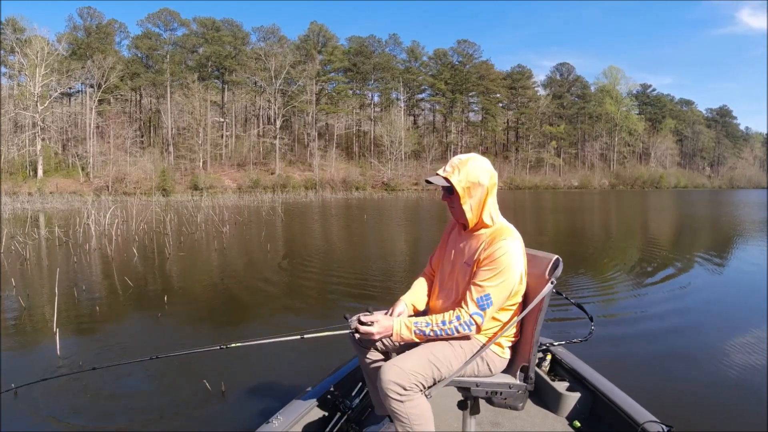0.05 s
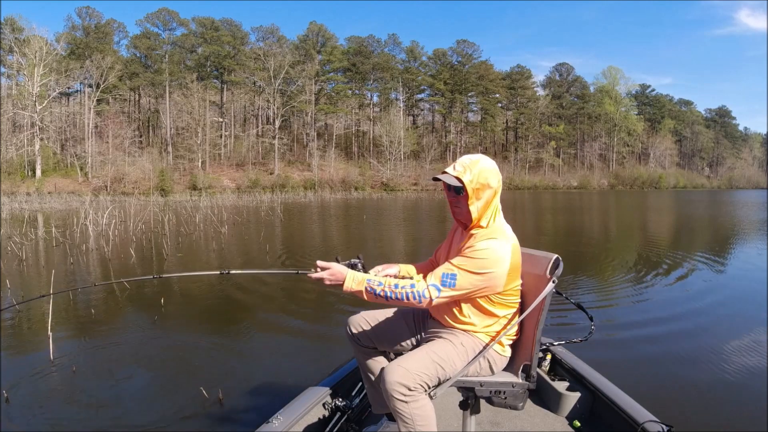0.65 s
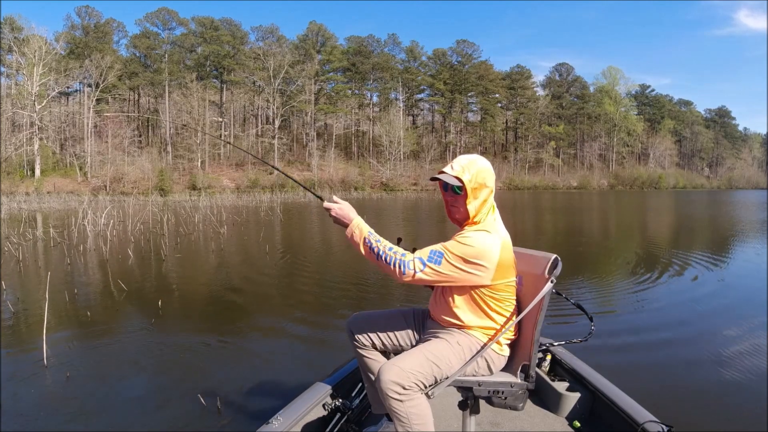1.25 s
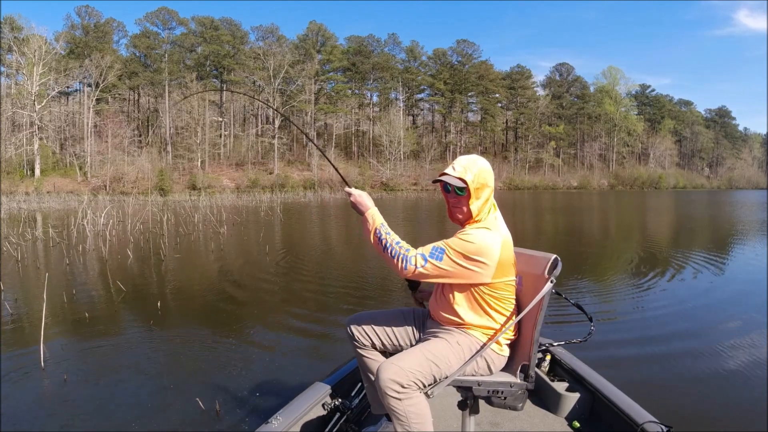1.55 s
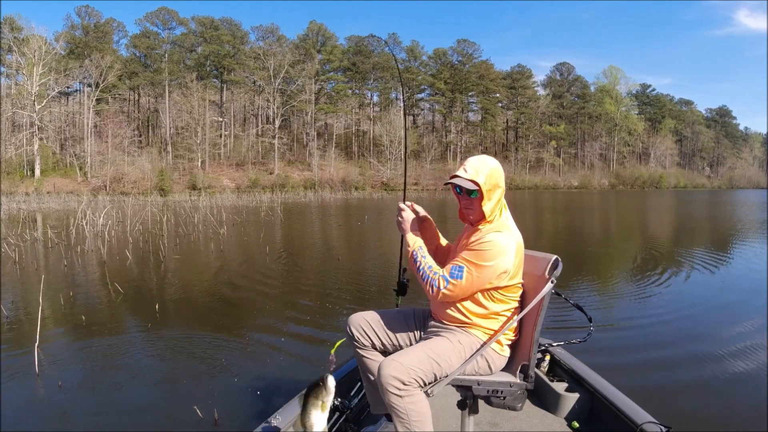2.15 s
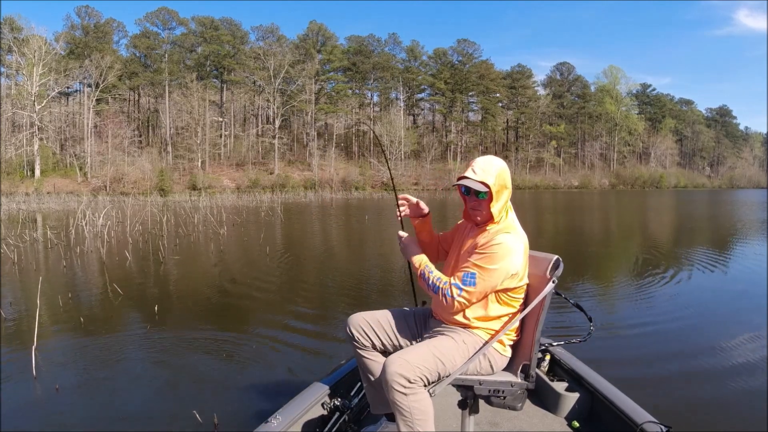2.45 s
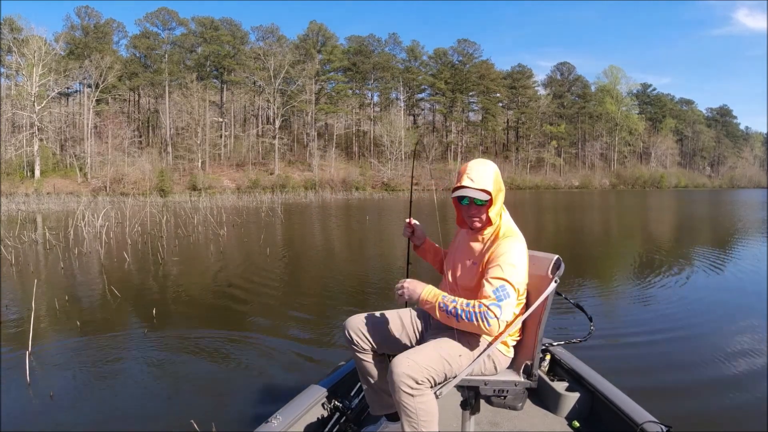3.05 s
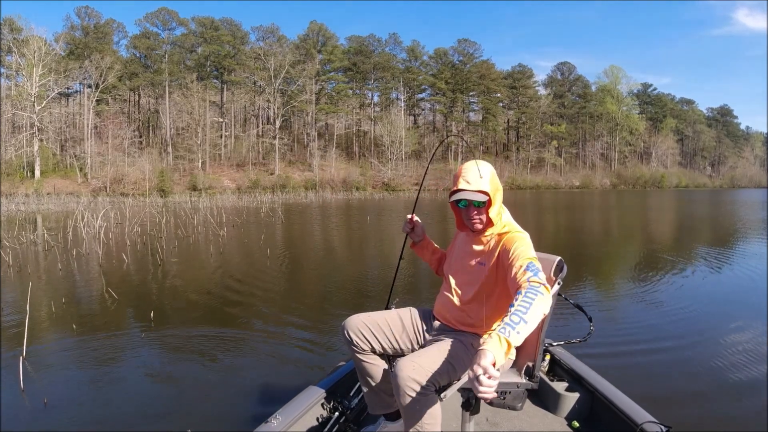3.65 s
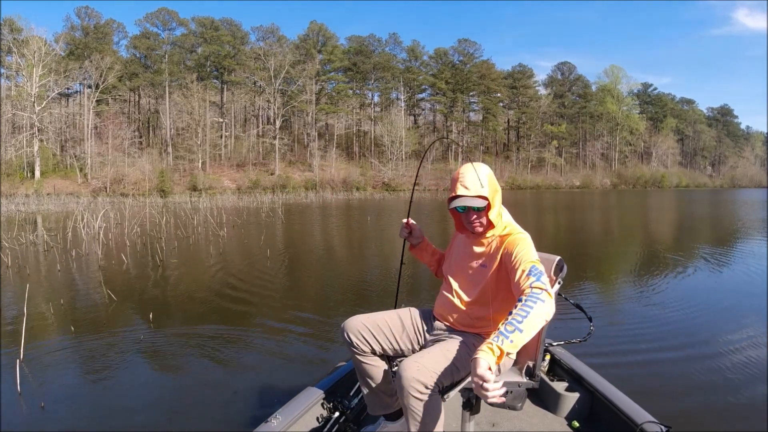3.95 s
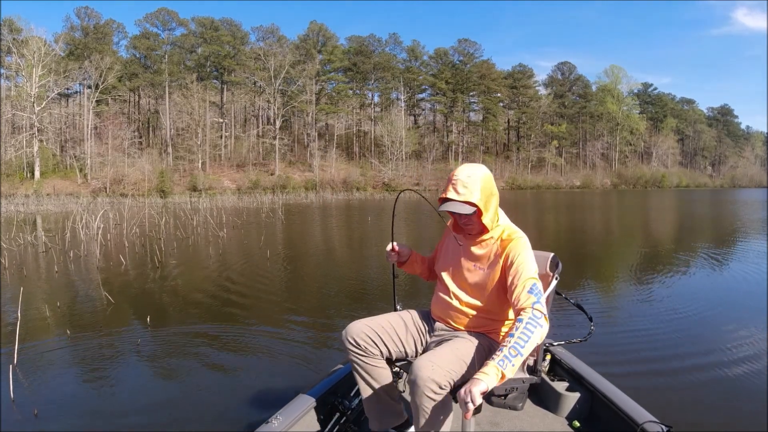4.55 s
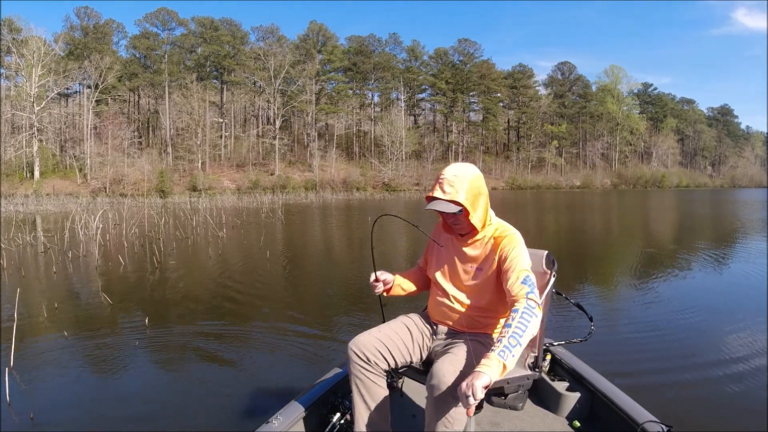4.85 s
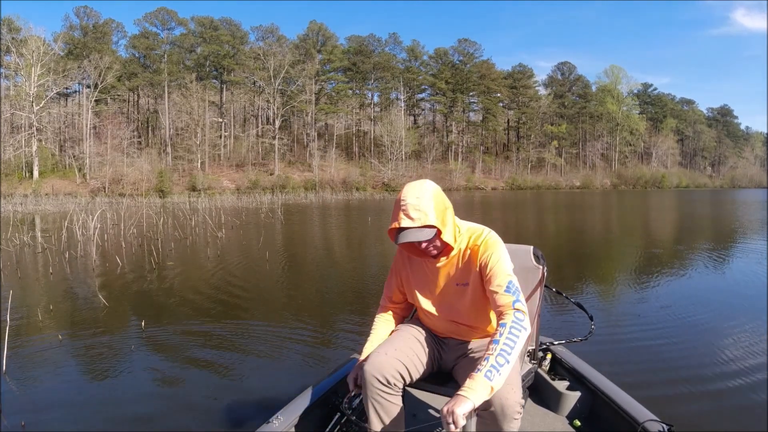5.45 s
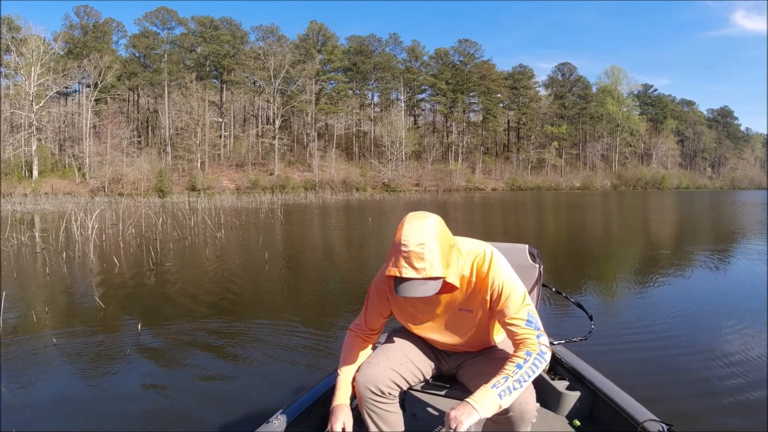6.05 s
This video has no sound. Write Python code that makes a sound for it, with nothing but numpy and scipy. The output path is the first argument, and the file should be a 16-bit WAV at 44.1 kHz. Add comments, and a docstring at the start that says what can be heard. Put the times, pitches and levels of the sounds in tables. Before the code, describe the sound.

A hooked fish plops and splashes beside a small metal boat while a swivel seat creaks. The fish plunges with a soft thud and a burst of spray, then comes aboard with dripping and sharp slaps. The seat creaks again, dull knocks sound through the hull, and tackle ticks faintly amid rubbing cloth. A last creak and lighter bumps follow. The microphone is close, with a faint breeze over a still lake.

```python
"""Plops and splashes: a fish is played to a small metal boat on a still lake, thrashes, plunges with a
thud and is swung aboard, dripping. The water sounds through ringing bubbles, slaps and spray. The
angler's swivel seat creaks in stick-slip jerks that travel through the hull; the deck takes knocks and
scuffs, the tackle ticks and jingles. Two close microphone ports hear it over a faint air rumble."""
import sys
import numpy as np
from scipy import signal
from scipy.fft import rfft, irfft, next_fast_len
from scipy.io import wavfile
from scipy.ndimage import uniform_filter1d

SR = 44100
rng = np.random.default_rng(int(sys.argv[2]) if len(sys.argv) > 2 else 0)


def store_pcm(level_fs):
    """Save levels as 16-bit WAV."""
    pcm = np.round(np.clip(level_fs, -1, 1) * 32767).astype(np.int16)
    wavfile.write(sys.argv[1], SR, np.atleast_2d(pcm).T)


N = 277830
EVENT_SIZE = 16384
AGE_S = np.arange(EVENT_SIZE) / SR
ANTIPHASE = np.array([[1], [-1]])

# soft thuds: the fish plunging beside the hull, then blows on the deck
# (time [s], thud [dB], boom [dB], second impact delay [s])
LOW_THUDS = [(1.663, -27.5, -37.5, .012), (1.756, -38.5, -41.5, 0.014), (2.683, -22, -24, .023),
             (2.815, -25, -21.5, .016), (3.101, -35.5, -36.5, .015), (3.201, -36, -37, .013),
             (3.74, -26, -38.5, .012), (3.807, -26, -43.5, 0.0084), (5.006, -36, -39.5, 0.017),
             (5.312, -46, -52.5, 0.0095), (5.481, -36.5, -47, .014), (5.561, -43.5, -48, .012),
             (5.632, -53, -42, 0.017), (5.873, -46, -60.5, .015)]
# spectrum of spray and wet swish: (frequency [Hz], level [dB])
SPRAY_SPECTRUM = [(3000, -18.5), (5000, -3.5), (6500, -8), (9500, -2), (11000, -22), (14000, -19.5),
                  (15500, -31.5)]
# side signal of the two ports: (frequency [Hz], gain [dB])
SIDE_SPECTRUM = [(60, -20), (150, -23.5), (400, -29), (700, -21.5), (1300, -12), (2400, -8), (3500, -6.5),
                 (4500, 4), (6000, -1.5), (8500, 0.5), (15000, -3)]


def splash():
    """Churned water: a swarm of small bubbles, plinking drops among them, fizzing spray above."""
    # surges of the fish: (crest [s], splash [dB], spray [dB], rise [s], t60 [s])
    surges = [(.2, -56.5, -88, 0.39, 0.56), (.84, -54.5, -110, 0.45, 1), (.93, -39.5, -51, 0.16, 0.37),
              (1.02, -32, -45.5, 0.13, 0.38), (1.11, -49, -66, 0.27, 0.18),
              (1.27, -58.5, -70.5, 0.98, 0.57), (1.662, -35, -50, 0.099, 0.13), (1.76, -54, -60, .25, 0.19),
              (1.9, -54, -87, 0.33, .5), (1.995, -47, -104, 0.13, 0.25)]
    # churned water: (frequency [Hz], level [dB])
    spectrum = [(100, -10.5), (300, 5.5), (700, 6.5), (1300, 4), (2200, -3), (4200, -5.5), (5200, -22),
                (8000, -36), (15000, -57)]
    churning, spraying = swells(surges)
    churn = grains(spectrum, per_s=2100, spread_db=3.0, cycles=10, band_hz=(325, 5950))
    drops = grains(spectrum, per_s=130, spread_db=7.5, cycles=140, band_hz=(818, 3460))
    spray = grains(SPRAY_SPECTRUM, per_s=4900, spread_db=3.0, cycles=54, band_hz=(4540, 14400))
    return churning * (from_db(2.0) * churn + from_db(-7.0) * drops) + spraying * spray


def bubbles(attack_s=0.00027, ring_cycles=56):
    """Trapped air rings, small pockets more briefly; most rise in pitch as they near the surface."""
    # larger air pockets: (time [s], level [dB], pitch [Hz], glide [octaves/s])
    pockets = [(.134, -28.5, 2304, 7), (.137, -44.5, 820, -3), (.176, -40, 519, 10.5),
               (.2, -38.5, 619, 10.5), (0.235, -33.5, 697, 4.5), (0.251, -45.5, 1740, -4),
               (.33, -43.5, 1340, -2.5), (0.782, -40, 1100, 3), (.801, -37.5, 1260, 3),
               (.814, -30, 513.5, 29), (.827, -24.5, 702, 22.5), (0.86, -27, 957, 15), (.87, -25.5, 590, 8),
               (0.837, -40, 2410, 10), (0.995, -33, 900, 15), (1.256, -44, 910, 11),
               (1.266, -42.5, 1820, 14), (1.335, -41.5, 1345, -0.5), (1.66, -28, 700, -7),
               (1.667, -34, 318.5, 3), (1.955, -39.5, 1314, 0), (2.022, -33.5, 1320, 7),
               (3.474, -40, 1297, 3.5)]
    out = np.zeros(N)
    for s, db, hz, glide in pockets:
        pitch_hz = hz * 2 ** np.minimum(glide * AGE_S, 1)
        ring = np.sin(2 * np.pi * np.cumsum(pitch_hz) / SR) * decay(ring_cycles / hz)
        add(out, s, from_db(db) * ring * onset(attack_s))
    return out


def slaps(crack_t60_s=0.015, patter_db=9.5, patter_cycles=71, width_octaves=0.86, attack_s=0.00095):
    """A sharp crack and a short patter, both centred on the pitch of what is hit."""
    # slaps and drops on water and boat: (time [s], level [dB], centre [Hz])
    hits = [(0.1254, -50, 2330), (0.133, -37, 2060), (.17, -43.5, 1980), (0.1973, -39, 2940),
            (0.765, -32, 2170), (.869, -30, 560), (1.642, -25.5, 4830), (1.656, -29, 1950),
            (1.725, -31.5, 1300), (1.7598, -28.5, 1010), (1.8663, -35, 1630), (1.8857, -33, 1520),
            (2.0006, -44.5, 1340), (2.0778, -23, 2260), (2.137, -39, 3460), (2.1438, -24, 3180),
            (2.19, -39, 1210), (2.6911, -25, 1050), (3.1183, -28.5, 2400), (3.1532, -23, 3770),
            (3.248, -35, 2420), (3.403, -36, 3700), (3.505, -24.5, 1400), (3.5996, -24, 3540),
            (3.6167, -33, 1330), (3.6798, -25.5, 3780), (3.7037, -37, 1470), (3.7966, -39.5, 1570),
            (4.154, -57, 3700), (4.317, -55.5, 2320), (4.724, -50.5, 4360), (4.801, -47, 4100),
            (5.8475, -33, 1380)]
    # slap noise: (frequency [Hz], level [dB])
    spectrum = [(100, 16.5), (600, 13), (4300, 8.5), (5400, -18.5), (7000, -22.5), (9500, -33),
                (12000, -28.5), (15000, -42.5)]
    attack = 1 - np.exp(-(AGE_S / attack_s) ** 2)
    out = np.zeros(N)
    for s, db, hz in hits:
        edges_hz = np.clip(hz * 2 ** (np.array([-.5, .5]) * width_octaves), 100, [SR / 3, SR / 2.2])
        band = signal.butter(1, edges_hz, "band", fs=SR, output="sos")
        grit = signal.sosfilt(band, noise(spectrum))
        envelope = (decay(crack_t60_s) + from_db(patter_db) * decay(patter_cycles / hz)) * attack
        add(out, s, from_db(db) * peak_one(grit * envelope))
    return out


def swivel_slips():
    """The swivel jerks singly and turns twice under the pull of the rod."""
    # single jerks: (time [s], level [dB], bass [dB])
    jerks = [(.4765, -48.5, 2.5), (.618, -48, -16), (2.4028, -38, 11), (2.4445, -32.5, 8), (2.4935, -31, 6),
             (2.575, -29.5, 5.5), (2.625, -30, 9), (2.7094, -26.5, 6), (2.7369, -27.5, 4.5),
             (2.7608, -26.5, 6), (2.7843, -28, 5.5), (2.8124, -32.5, -3.5), (2.8625, -29, 5),
             (3.6001, -35, 12), (3.6805, -37.5, 13), (3.746, -45, 13.5), (3.813, -44, 13)]
    # one curve per turn: (time [s], slip rate [1/s], level [dB], bass [dB])
    turns = [
        [(.89, 206, -40.5, 10.5), (.923, 182, -31.5, 2.5), (.96, 110, -45, 6.5)],
        [(1.0046, 87, -27, 2.5), (1.055, 180, -27.5, 5.5), (1.113, 55, -27, 4.5)],
    ]
    return [*jerks, *(slip for turn in turns for slip in stick_slip(turn))]


def foot_slips():
    """The seat's foot creaks as the angler leans over, then jerks singly."""
    # single jerks: (time [s], level [dB], bass [dB])
    jerks = [(5.478, -31.5, 2), (5.496, -40, -23), (5.5464, -38, -2), (5.5643, -39, -9), (5.6347, -45, -1),
             (5.665, -40.5, -37), (6.2712, -49, -20)]
    # leaning: (time [s], slip rate [1/s], level [dB], bass [dB])
    lean = [(4.9745, 66, -38.5, 6), (5.04, 42, -32.5, 9.5), (5.11, 90, -28.5, 5.5),
            (5.145, 122, -28.5, -1.5), (5.185, 64, -29.5, 8), (5.26, 50, -42, 15.5), (5.35, 55, -45, -1)]
    return [*jerks, *stick_slip(lean)]


def stick_slip(movement, jitter_s=.0005, spread_db=2.5, bass_spread_db=1, max_slips=64):
    """A loaded joint lets go once per step of wind-up; gives (time [s], level [dB], bass [dB])."""
    s, per_s, db, bass_db = np.transpose(movement)
    t = np.arange(s[0], s[-1], 1 / SR)
    wound_steps = np.cumsum(np.interp(t, s, per_s)) / SR
    scatter = rng.standard_normal((max_slips, 3)) * [jitter_s, spread_db, -bass_spread_db]
    at_s = np.interp(np.arange(wound_steps[-1]), wound_steps, t)[:max_slips]
    slips = np.transpose([at_s, np.interp(at_s, s, db), np.interp(at_s, s, bass_db)])
    return slips + scatter[:len(at_s)]


def seat():
    """Swivel and foot each shake their own hull modes and ping the post; the thuds ping it too."""
    # hull driven by the swivel: (frequency [Hz], level [dB], t60 [s])
    swivel_modes = [(230.6, 7.5, 0.055), (337.3, 14, 0.22), (450.5, 11, 0.062), (596.5, 10.5, 0.1),
                    (700, 12.5, 0.065), (900, 5.5, 0.027), (1309, 6.5, 0.17), (1610, 5, 0.016),
                    (1768, -1, 0.054), (2154, 14.5, 0.1), (2255, -9.5, 0.023), (2570, -10, 0.099),
                    (2937, -2, 0.013), (3380, -1, 0.0091), (3690, -20.5, 0.0076), (4040, -7.5, 0.016),
                    (4360, -8, 0.018)]
    # hull driven by the foot: (frequency [Hz], level [dB], t60 [s])
    foot_modes = [(190, 7.5, 0.11), (267, 5.5, 0.08), (434, 8, 0.094), (610, 6.5, 0.11), (716, 12.5, 0.041),
                  (900, 2, 0.029), (1416, 10, 0.084), (1620, 0.5, 0.0041), (2170, 6.5, 0.024),
                  (2405, -0.5, 0.013), (2715, 7, 0.024), (2944, 6, 0.021), (3770, 2, 0.0079),
                  (4200, -7, 0.0054), (4405, -10.5, 0.0037), (5500, -2.5, 0.057)]
    at_swivel, at_foot = swivel_slips(), foot_slips()
    swivel = creak(at_swivel, swivel_modes, travel_s=0.008375, first_db=5.0, bass_hz=1080,
                   echo_s=0.003, echo_db=-15.0, grind_db=1.5, grind_t60_s=0.04)
    foot = creak(at_foot, foot_modes, travel_s=0.00378, first_db=-1.5, bass_hz=1130,
                 echo_s=0.0031, echo_db=-3.0, grind_db=3.0, grind_t60_s=0.024)
    post = seat_post([*at_swivel, *at_foot, *LOW_THUDS])
    return from_db(-6.0) * swivel + from_db(-12.5) * foot + post


def creak(slips, modes, travel_s, first_db, bass_hz, echo_s, echo_db, grind_db, grind_t60_s):
    """Each slip sends a bending wave through the hull: treble first, bass last; the panels ring on."""
    # first arrival: (frequency [Hz], level [dB])
    first_spectrum = [(60, -15.5), (200, -5.5), (450, 4), (850, -5.5), (1200, -9), (1700, -9), (3300, -9),
                      (4400, -12), (5200, -38), (10000, -69)]
    hz = np.fft.rfftfreq(EVENT_SIZE, 1 / SR)
    first = from_db(first_db) * gain_at(first_spectrum, hz)
    rings = np.array([from_db(db) / (1 + 2j * np.pi * (hz - mode_hz) * t60_s / np.log(1000))
                      for mode_hz, db, t60_s in modes])
    rings /= 1 + (hz / np.array(modes)[:, :1] - 1) ** 2 * 30   # narrows each mode's skirts
    # wave speed goes as the root of frequency
    delay_s = travel_s * (np.sqrt(1000 / np.clip(hz, 250, 2200)) - np.sqrt(1000 / 2200)) + .001
    path = np.exp(-2j * np.pi * np.cumsum(delay_s) * hz[1])
    short_waves = hz ** 8 / (hz ** 8 + 2000.0 ** 8)
    path *= 1 + from_db(echo_db) * short_waves * np.exp(-2j * np.pi * hz * echo_s)   # bounce off a rib
    treble = (hz > 2000) & (hz < 4800)
    fade = np.minimum(1, 2 * (1 - AGE_S / AGE_S[-1])) ** 2
    out = np.zeros(N)
    for s, db, bass_db in slips:
        grit = rng.standard_normal(EVENT_SIZE) * decay(grind_t60_s)   # the joint grinds as it lets go
        slip = 1 + from_db(grind_db) * rfft(grit) / np.linalg.norm(grit) * hz / (hz + 500)
        mode_gains = from_db(rng.normal(0, 1.49, len(modes)))
        wave = slip * (first + mode_gains @ rings) * path
        treble_peak = peak_rms(irfft(wave * treble))
        bass_shelf = from_db(bass_db / (1 + (hz / bass_hz) ** 4))
        add(out, s, from_db(db) * irfft(wave * bass_shelf) * fade / treble_peak)
    return out


def seat_post(jolts, attack_s=0.0084):
    """Each jolt pings the steel post."""
    # steel post: (frequency [Hz], level [dB], t60 [s])
    modes = [(5040, 0, 0.025), (5550, -9, 0.06), (7750, -10, 0.065), (7880, -13, 0.024),
             (10100, -12, 0.019)]
    # how freely it rings as its load shifts: (time [s], gain [dB])
    freedom = [(1.1, -65), (2.62, -46), (2.72, -14), (3.8, -20.5), (4.95, -49), (5.45, -65)]
    out = np.zeros(N)
    for s, db, *_ in jolts:
        freedom_db = np.interp(s, *np.transpose(freedom))
        add(out, s, from_db(db + freedom_db) * struck(modes) * onset(attack_s))
    return out


def thuds(contact_s=0.0078, thud_t60_s=.11, ring_db=-1.5, boom_gain_db=6.0, boom_attack_s=0.0028):
    """A plunge or a blow thuds, rings the panels and booms the hull; a softer impact follows."""
    # thud: (frequency [Hz], level [dB])
    spectrum = [(40, -25), (130, 1), (280, 7.5), (700, -5), (1100, -14.5), (2200, -23.5), (4200, -33),
                (6000, -68)]
    # deck panels: (frequency [Hz], level [dB], t60 [s])
    panel_modes = [(137, -17, 0.29), (222.8, -6, 0.24), (284.6, -1.5, 0.23), (342, -13.5, 0.14),
                   (430, -4, 0.08), (547, -4, 0.15), (667, -12, 0.13), (744, 2, 0.052), (900, -17, 0.066)]
    # whole hull flexing: (frequency [Hz], level [dB], t60 [s])
    boom_modes = [(68.2, -3, .24), (79, -6, 0.21), (94.8, -1.5, 0.3), (139, -8.5, 0.1)]
    boom = sum(from_db(db) * np.sin(2 * np.pi * hz * AGE_S) * decay(t60) for hz, db, t60 in boom_modes)
    boom *= onset(boom_attack_s)
    out = np.zeros(N)
    for s, db, low_db, gap_s in LOW_THUDS:
        first, second = (s, db, low_db), (s + gap_s, db - 8.5, low_db - 8)
        for at_s, thud_db, boom_db in (first, second):
            thud = peak_one(noise(spectrum) * decay(thud_t60_s))
            panels = from_db(ring_db) * peak_one(struck(panel_modes))
            body = peak_one((thud + panels) * onset(contact_s))
            add(out, at_s, from_db(thud_db) * body + from_db(boom_db + boom_gain_db) * boom)
    return out


def scuffs():
    """Rubbing: a run of small dry catches, a finer swish of wet cloth above."""
    # sleeve, shoes and flapping fish: (crest [s], scuff [dB], hiss [dB], rise [s], t60 [s])
    strokes = [(3.106, -43, -54.5, .025, 0.18), (3.153, -43, -44, 0.11, 0.052),
               (3.195, -39.5, -48, 0.16, 0.24), (3.3, -46, -55, 0.05, 0.11), (3.39, -54.5, -92, 0.38, 0.26),
               (3.53, -50, -69, 0.27, 0.067), (3.76, -55.5, -72.5, 1, 0.16), (5.135, -41.5, -58, 0.3, 0.52),
               (5.378, -56.5, -98, 0.054, .2), (5.49, -48.5, -91, 0.069, 0.16),
               (5.56, -57.5, -92, .08, 0.18), (5.66, -65.5, -97, 0.57, 1), (6.29, -59, -91, 0.28, .3)]
    # cloth catching: (frequency [Hz], level [dB])
    spectrum = [(100, 13.5), (300, 14), (800, 2), (1600, -1.5), (3000, -4), (4400, -7), (5300, -22.5),
                (9000, -52), (15000, -52)]
    rubbing, hissing = swells(strokes)
    catches = grains(spectrum, per_s=1600, spread_db=-0.5, cycles=2.0, band_hz=(206, 5540))
    swish = grains(SPRAY_SPECTRUM, per_s=11000, spread_db=2.5, cycles=52, band_hz=(4630, 13100))
    return from_db(4.0) * rubbing * catches + from_db(-7.5) * hissing * swish


def ticks(attack_s=0.00069, t60_s=0.011):
    """Hard parts of the tackle touch with a short, bright snap."""
    # contacts: (time [s], level [dB])
    contacts = [(2.142, -86), (2.496, -69.5), (2.763, -54), (3.139, -41.5), (3.151, -35.5), (3.5996, -64),
                (3.6797, -53.5)]
    # snap: (frequency [Hz], level [dB])
    spectrum = [(2500, -19.5), (5000, 2.5), (9500, 0.5), (12000, -22), (15000, -21.5)]
    out = np.zeros(N)
    for s, db in contacts:
        snap = noise(spectrum) * decay(t60_s) * onset(attack_s)
        add(out, s, from_db(db) * peak_one(snap))
    return out


def jingle(attack_s=0.00055):
    """The lure's metal fittings tinkle as the fish shakes."""
    # shakes: (time [s], level [dB])
    shakes = [(2.078, -81.5), (3.141, -54.5), (3.153, -54), (3.181, -49), (3.228, -56)]
    # fittings: (frequency [Hz], level [dB], t60 [s])
    modes = [(9450, -1.5, 0.17), (10280, 0, .12), (11000, 0, 0.07), (13790, -1, 0.11), (13930, -14, .06)]
    out = np.zeros(N)
    for s, db in shakes:
        add(out, s, from_db(db) * struck(modes) * onset(attack_s))
    return out


def air(side_db=-5.5):
    """Faint rumble that follows the breeze, over a steady hush."""
    # breeze: (time [s], level [dB])
    breeze = [(0.0, -48.5), (1.2, -51), (1.9, -53.5), (3.79, -54.5), (4.05, -61.5), (4.8, -57.5),
              (6.3, -53.5)]
    # open-air hush: (frequency [Hz], level [dB])
    hush_spectrum = [(12, -35), (20, 4.5), (46, -10), (97, -22), (135, -17), (160, -21), (387, -29),
                     (433, -22.5), (1140, -29.5), (1460, -34), (2100, -34.5), (2340, -37.5), (2770, -35),
                     (15000, -63)]
    rumble_hz_db = [(15, -6.0), (35, 2), (110, 2.0), (220, -10.0), (500, -21), (2000, -61.0)]
    breeze_db = np.interp(np.arange(N) / SR, *np.transpose(breeze))
    mid, side = noise(hush_spectrum, (2, N))
    rumble, eddies = rms_one(noise(rumble_hz_db, (2, N)))
    hush = from_db(-64) * (rms_one(mid) + from_db(side_db) * rms_one(side) * ANTIPHASE)
    return hush + from_db(breeze_db - 5.5) * (rumble + from_db(-10.5) * eddies * ANTIPHASE)


def on_the_boat(x, left_lead, scatter_db, scatter_t60_s, shore_db, shore_t60_s=0.26):
    """Two close ports differ in phase, most in the treble; the boat scatters, the shore echoes."""
    size = next_fast_len(N + EVENT_SIZE)
    scatter = rng.standard_normal(EVENT_SIZE) * decay(scatter_t60_s) * (1 - decay(.01))
    sideways = 1j * left_lead + from_db(scatter_db) * rfft(scatter, size) / np.linalg.norm(scatter)
    side_gain = gain_at(SIDE_SPECTRUM, np.fft.rfftfreq(size, 1 / SR))
    side = irfft(rfft(x, size) * side_gain * sideways, size)[:N]
    shore_hz_db = [(100, -28.0), (600, -4.0), (2000, -1.5), (5000, 0.0), (12000, 3.5)]
    echoes = noise(shore_hz_db, (2, EVENT_SIZE)) * decay(shore_t60_s)
    tail = signal.fftconvolve(x[None], echoes / np.linalg.norm(echoes[0]), axes=1)[:, :N]
    return x + side * ANTIPHASE + from_db(shore_db) * tail


def grains(spectrum, per_s, spread_db, cycles, band_hz):
    """Random tiny pops of uneven size, each ringing at one of 20 pitches; rms 1."""
    sizes = from_db(spread_db * np.minimum(rng.exponential(1, N), 4)) * rng.choice([-1, 1], N)
    clicks = sizes * (rng.random(N) < per_s / SR)
    pitch_index = rng.integers(0, 20, N)
    out = np.zeros(N)
    for k, hz in enumerate(np.geomspace(*band_hz, 20)):
        radius, angle = from_db(-60 * hz / (cycles * SR)), 2 * np.pi * hz / SR
        poles = [1, -2 * radius * np.cos(angle), radius ** 2]
        out += signal.lfilter([angle, 0, -angle], poles, clicks * (pitch_index == k) + 1e-18)
    return rms_one(colour(out, spectrum))


def swells(rows):
    """Swells rise and fall linearly in dB and add in power; gives body gain and treble gain."""
    power = np.zeros((2, N))
    for crest_s, body_db, treble_db, rise_s, t60_s in rows:
        since_s = np.arange(N) / SR - crest_s
        envelope = from_db(-60 * np.minimum(np.maximum(-since_s / rise_s, since_s / t60_s), 2))
        power += (from_db([[body_db], [treble_db]]) * envelope) ** 2
    return np.sqrt(power)


def struck(modes):
    """Modes ring out, with random strength and phase at each blow."""
    return sum(from_db(db + rng.normal(0, 4.4)) * np.sin(2 * np.pi * (hz * AGE_S + rng.random()))
               * decay(t60_s) for hz, db, t60_s in modes)


def noise(spectrum, shape=EVENT_SIZE):
    return colour(rng.standard_normal(shape), spectrum)


def colour(x, spectrum):
    size = next_fast_len(x.shape[-1] + 2048)
    gain = gain_at(spectrum, np.fft.rfftfreq(size, 1 / SR))
    return irfft(rfft(x, size) * gain, size)[..., :x.shape[-1]]


def gain_at(spectrum, hz):
    knots_hz, db = np.transpose(spectrum)
    return from_db(np.interp(np.log(hz + 1), np.log(knots_hz), db))


def onset(attack_s):
    return 1 - np.exp(-AGE_S / attack_s)


def decay(t60_s):
    return np.exp(-np.log(1000) * AGE_S / t60_s)


def from_db(db):
    return 10 ** (np.asarray(db) / 20)


def rms_one(x):
    return x / np.sqrt(np.mean(x ** 2) + 1e-20)


def peak_rms(x):
    """Rms of the loudest 4 ms."""
    return np.sqrt(uniform_filter1d(x ** 2, size=176).max() + 1e-20)


def peak_one(x):
    return x / peak_rms(x)


def add(track, at_s, sound):
    start = int(np.clip(round(at_s * SR), 0, N - 1))
    track[start:start + len(sound)] += sound[:N - start]


def scene():
    """Water to the left; seat, thuds and landed fish a little to the right."""
    background = air()
    thudding = from_db(-3.5) * thuds()
    water = splash() + bubbles()
    fish = from_db(-8.5) * slaps() + scuffs() + jingle() + ticks()
    left = on_the_boat(water, left_lead=0.98, scatter_db=-13.0, scatter_t60_s=0.045, shore_db=-6.5)
    # fresh grains in antiphase spread the spray and rubbing wide
    wide = from_db(-4.0) * colour(splash() + scuffs(), SIDE_SPECTRUM) * ANTIPHASE
    near = seat() + thudding + fish
    right = on_the_boat(near, left_lead=-0.83, scatter_db=-15.0, scatter_t60_s=0.05, shore_db=-9.0)
    return left + right + wide + background


def record(dry):
    """Steep low-pass."""
    cutoff_hz = 15300
    return signal.sosfilt(signal.ellip(10, .2, 80, cutoff_hz, fs=SR, output="sos"), dry)


dry = scene()
out = record(dry)
store_pcm(out)
```